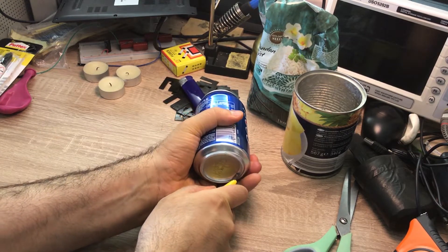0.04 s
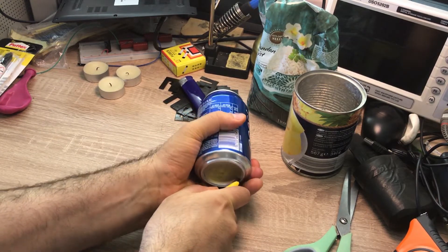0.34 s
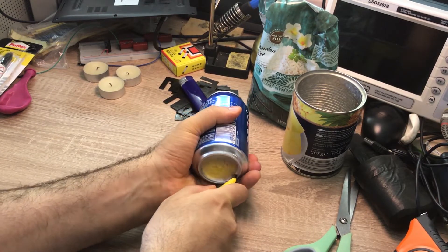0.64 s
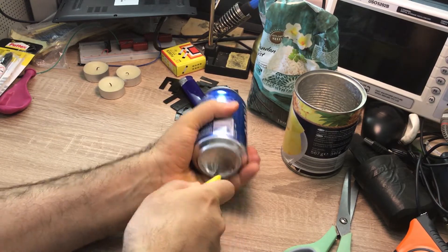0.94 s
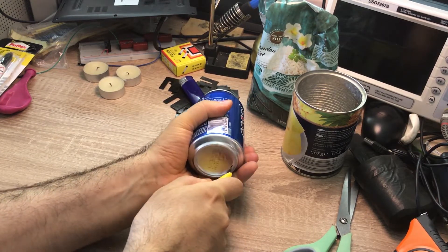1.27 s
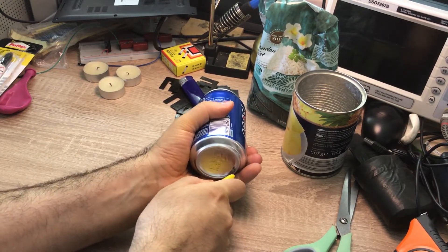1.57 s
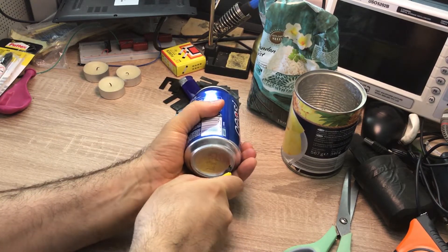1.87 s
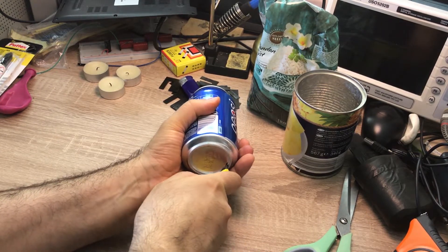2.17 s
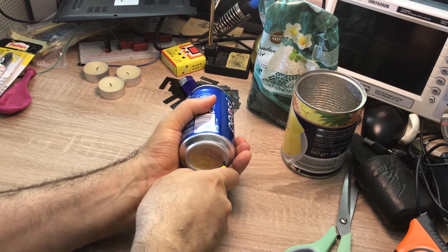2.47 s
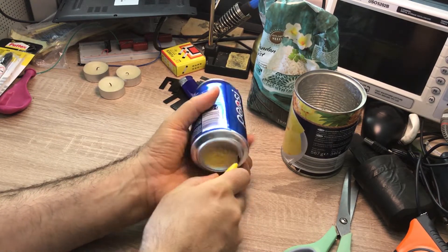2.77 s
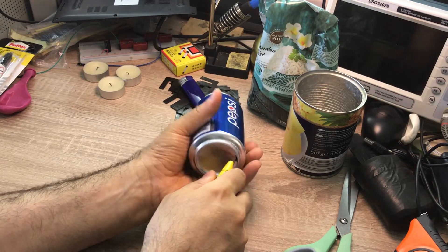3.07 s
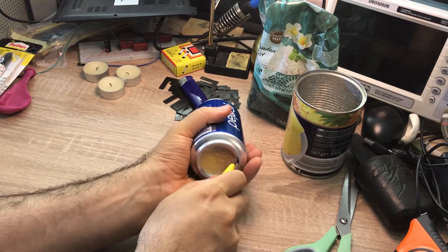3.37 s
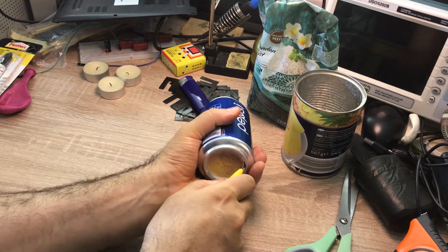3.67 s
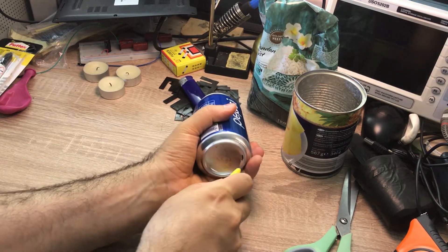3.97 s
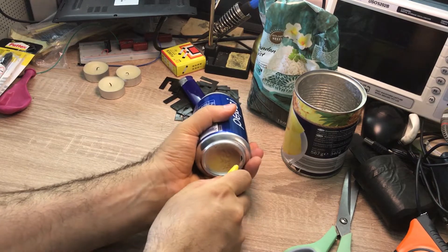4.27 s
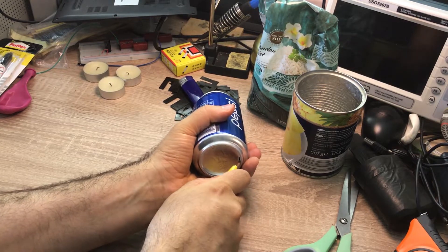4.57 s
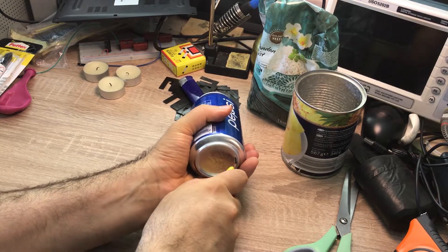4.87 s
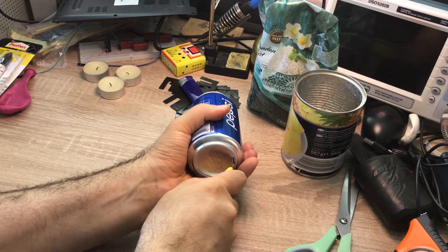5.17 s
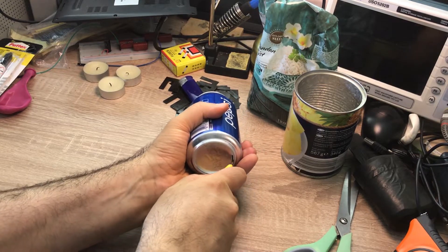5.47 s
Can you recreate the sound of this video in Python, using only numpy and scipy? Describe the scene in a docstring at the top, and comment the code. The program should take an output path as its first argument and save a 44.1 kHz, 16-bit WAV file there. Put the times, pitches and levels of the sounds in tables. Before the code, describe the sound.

A utility knife bites into the bottom of an empty aluminium can with a sharp snap and a low thud. The blade sticks and slips in scattered tinny clicks, then scrapes briefly through a denser run of crackles midway. The thin wall pops, hands bump dully on a wooden desk and fingers rub faintly on the can. It sounds close, in a small, quiet room with faint hum and hiss.

```python
"""A utility knife works through the bottom rim of an empty aluminium can, held over a wooden desk.
The blade sticks, then tears on in short runs of tiny fractures that ring the thin wall and the air
inside. The first cut jolts the can with a low thud. The hands bump the desk, the wall pops under the
fingers, and skin rubs on the paint. Two faint squeaks glide upward.
A small, quiet room answers, over low rumble, hum and hiss."""
import sys
import numpy as np
from scipy import signal
from scipy.fft import rfft, irfft
from scipy.io import wavfile

SR = 44100
rng = np.random.default_rng(int(sys.argv[2]) if len(sys.argv) > 2 else 0)


def to_wav(s):
    """Save 16-bit WAV."""
    ch = np.atleast_2d(s).T  # columns
    pcm = np.round(np.clip(ch, -1, 1) * 32767)  # PCM
    wavfile.write(sys.argv[1], SR, pcm.astype(np.int16))


N = 244314
SPAN, LEAD = 2 ** 15, 2 ** 11  # samples in one event, and ahead of its peak
T = np.arange(SPAN) / SR
ALL_ROUND = .3  # share of the ring in the sound that spreads to all sides

# Centres in Hz of the bands that shape the blade's snaps.
CUT_BANDS_HZ = [900, 2500, 6200, 13000]
# The hand-damped aluminium wall. Each row: mode in Hz, dB over the bare click, t60 in seconds.
WALL_MODES = [(783, 7.5, 0.014), (1268, 4.5, 0.035), (1585, 3.5, 0.0443), (1796, 7, 0.079),
              (2050, 0, 0.027), (2360, 0, 0.022), (2570, 1, 0.017), (2795, 2.5, 0.016), (3157, 0, 0.042),
              (3407, 5, .035), (3870, 2, .03), (4520, 2.5, .02), (5740, 1.5, 0.026), (6100, 5, 0.031),
              (6280, 10, 0.016), (6960, 9.5, 0.021), (8680, 5.5, 0.011), (9100, -9.5, 0.014),
              (12230, 10, .03)]
# The blade scores the metal. Each row: time of the hardest push in seconds, level in dB.
STROKES = [(2.74, -55.5), (2.959, -58), (3.091, -64)]
STROKE_SWELL_DB_S, STROKE_EASE_DB_S = 151, 187


def undb(db):
    """Decibels to gain."""
    return 10 ** (np.asarray(db) / 20)


def unit(x):
    """Scale to energy 1."""
    return x / np.sqrt(np.sum(x ** 2) + 1e-20)


def along(points, size):
    """Read (Hz, value) points at every bin of a spectrum."""
    hz, value = np.transpose(points)
    return np.interp(np.log(np.arange(size // 2 + 1) * SR / size + 1), np.log(hz), value)


def band_weights(centres):
    """Overlapping bands that add up to the whole spectrum of an event."""
    return np.array([along(list(zip(centres, row)), SPAN) for row in np.eye(len(centres))])


def pass_filter(x, hz, kind, order=2):
    """High-pass or low-pass."""
    return signal.sosfilt(signal.butter(order, hz, kind, fs=SR, output="sos"), x)


def colour(x, points):
    """Shape x by (Hz, dB) points, rms 1."""
    return unit(irfft(rfft(x) * undb(along(points, N)), N)) * np.sqrt(N)


def voiced(x, centres, levels_db):
    """Bend the spectrum smoothly toward each band's level, as rms over 10 ms."""
    spectrum, bands = rfft(x), band_weights(centres)
    for _ in range(2):
        power = 2 * bands ** 2 @ np.abs(spectrum) ** 2 / (SPAN * SR * .01)
        boost_db = levels_db - 10 * np.log10(power)
        spectrum = spectrum * undb(along(list(zip(centres, boost_db)), SPAN))
    return irfft(spectrum, SPAN)


def fade(t60):
    """Exponential decay, 60 dB down after t60 seconds."""
    return np.exp(-np.log(1000) * T / max(t60, 1e-3))


def swell(pushes, rise_db_s, fall_db_s):
    """Gain over time of (s, dB) pushes that each swell and ease at steady rates."""
    t = np.arange(N) / SR
    curves_db = [db - np.maximum(rise_db_s * (s - t), fall_db_s * (t - s)) for s, db in pushes]
    return undb(np.max(curves_db, axis=0))


def add(out, s, x):
    """Mix x in at s seconds."""
    i = int(s * SR)
    out[i:i + len(x)] += x[:len(out) - i]


def ring(hz, t60, attack_s):
    """One mode with a soft onset."""
    return np.sin(2 * np.pi * hz * T) * fade(t60) * (1 - fade(attack_s))


def body(modes, grip_db, detune):
    """Ring of struck modes; contact point and grip vary their strength and pitch at each blow."""
    out = np.zeros(SPAN)
    for (hz, db, t60), (grip, drift) in zip(modes, rng.standard_normal((len(modes), 2))):
        peak = undb(db + grip_db * grip) * 2 * np.log(1000) / (t60 * SR)
        out += peak * np.cos(2 * np.pi * hz * (1 + detune * drift) * T) * fade(t60)
    return out


def resonate(x, response, share=1):
    """The bare excitation plus the ring it drives."""
    return x + share * signal.fftconvolve(x, response)[:len(x)]


def snap_run(rise_ms, fall_ms, grain_db, rattle_db, rattle_t60):
    """A run of tiny snaps that swells and dies; bending waves rattle on after it."""
    ms = (np.arange(SPAN) - LEAD) / SR * 1000
    run = np.exp(-np.abs(ms) / np.where(ms < 0, rise_ms, fall_ms))
    rattle = undb(rattle_db) * np.roll(fade(rattle_t60), LEAD) * (ms >= 0)
    sizes = np.repeat(undb(grain_db * rng.standard_normal(SPAN // 16)), 16)
    return rng.standard_normal(SPAN) * np.hypot(run * sizes, rattle)


def background():
    """A bed of faint hum, low room rumble and thin microphone hiss."""
    # Steady tones. Each row: pitch in Hz, rms level in dB.
    hum_tones = [(49.5, -76), (140, -78.5)]
    # Two noise colours. Each row: frequency in Hz, relative level in dB.
    rumble_colour = [(13, -37.5), (22, -13.5), (33, -5.5), (54, 0), (113, -13.5), (135, -11), (279, -15.5),
                     (418, -21.5), (551, -23), (784, -25), (867, -24.5), (959, -28), (1300, -30.5),
                     (9000, -41), (11700, -62), (19800, -120)]
    hiss_colour = [(3000, -39), (6800, -10.5), (7200, -5.5), (7700, -27), (9300, -8.5), (10500, -15),
                   (11700, -6.5), (12350, 1), (13200, -3), (14500, 1.5), (15200, -4.5), (16500, -7)]
    t = np.arange(N) / SR
    hum = sum(undb(db) * np.sqrt(2) * np.sin(2 * np.pi * (hz * t + rng.random())) for hz, db in hum_tones)
    rumble = undb(-64.52) * colour(rng.standard_normal(N), rumble_colour)
    hiss = undb(-74.5) * colour(rng.standard_normal(N), hiss_colour)
    return rumble + hiss + hum


def desk_bumps():
    """The hands knock dully on the wooden top. Returns the direct sound and the room send."""
    # Each row: time in seconds, die-away in ms, relative level in dB, contact hardness from 0 to 1.
    bumps = [(0.2211, 8.5, -47.5, 0.1), (.877, 4.5, -48.5, .05), (2.77, 3.3, -40.5, 0),
             (3.2586, 6.6, -36, 0.73), (4.133, 7.4, -44.5, 0.9)]
    # Band centres in Hz, then the dB in each band for a soft and for a hard contact.
    bands_hz = [120, 280, 700, 2200, 7000]
    soft_db = [-7, 0, -8.5, -28, -36]
    hard_db = [-11.5, -1.5, 4, -1.5, -20]
    # The desk top. Each row: mode in Hz, dB over the bare knock, t60 in seconds.
    desk_modes = [(133, 8, .12), (213, 13, 0.095), (276, 17, .06), (574, 18, 0.048), (666, 0.5, .02),
                  (848, 13, 0.096), (1120.4, 6, 0.076), (1785, 3.5, 0.044), (2120, 8.5, .03),
                  (3080, 3, 0.0072)]
    direct, send = np.zeros((2, N))
    for s, fall_ms, db, hardness in bumps:
        levels_db = db + (1 - hardness) * np.array(soft_db) + hardness * np.array(hard_db)
        force = snap_run(.5, fall_ms, grain_db=2, rattle_db=-15, rattle_t60=0.1)
        force = pass_filter(pass_filter(force, 100, "high"), 3700, "low")
        wood = body(desk_modes, grip_db=7.5, detune=.004)
        for bus, share in (direct, 1), (send, ALL_ROUND):
            add(bus, s - LEAD / SR, voiced(resonate(force, wood, share), bands_hz, levels_db))
    return undb(2.52) * np.array([direct, send])


def blade_moves():
    """Slips, drags, gives and chips as (s, rise ms, fall ms, patch Hz, dB, dB per octave, cavity dB)."""
    # The blade slips with a snap. Each row: time in seconds, die-away in ms, pitch of the dented patch
    # in Hz, relative level in dB, brightness in dB per octave, relative air cavity level in dB.
    slips = [(0.2225, 1.9, 6010, -27.5, 0.5, -32.5), (0.2251, 6.8, 5960, -31.5, -3.5, -33.5),
             (0.418, 0.91, 2000, -47.5, -2.5, -53), (0.4539, 3, 990, -59, -4, -53),
             (0.458, 1.5, 2295, -36, -3, -38.5), (0.6494, 1.35, 1980, -34, 0, -39.5),
             (0.7153, 2.8, 2410, -43, -2.5, -33.5), (0.805, 1.7, 1000, -68.5, -3.5, -82),
             (0.8779, 8.9, 5820, -39, -.5, -65), (0.887, 3.5, 6700, -46, 4.5, -84),
             (0.893, 3, 14400, -34, 2.5, -75), (1.3523, 1.4, 6000, -58, 0.5, -66),
             (1.4224, 1.2, 1980, -61.5, -2.5, -80), (1.4521, 0.97, 6000, -48.5, .8, -47),
             (1.4595, 2.6, 2530, -43, 1, -52), (1.4716, 1.9, 1990, -55.5, -4.5, -75),
             (1.534, 0.44, 1990, -53.5, -3, -72), (2.679, 4, 1160, -55, 1, -42.5),
             (2.6946, 0.9, 2600, -46.5, -0.5, -80), (2.7059, 1.56, 3070, -35.5, 4, -64),
             (2.716, 2, 3230, -47, 0, -41), (2.8492, 4.5, 3200, -61, 1, -62.5),
             (2.9064, 5.3, 6940, -50.5, .5, -52), (2.916, 3.7, 3250, -51.5, 1, -49.5),
             (2.9444, 2.6, 4250, -47, 3.5, -80), (2.9501, 1.8, 6800, -53, 8.5, -74),
             (2.9685, 2.7, 12560, -52, 0, -55.5), (2.981, 0.98, 6690, -57, -4, -50.5),
             (3.0095, 0.68, 1198, -43, -.5, -65), (3.058, 1.8, 6720, -37, -1, -77),
             (3.1649, 3.8, 1018, -57.5, -3, -72.5), (3.1908, 1.6, 6570, -47, -0.6, -47),
             (3.2251, 0.86, 3700, -58.5, -5.5, -58), (3.289, 2, 1214, -56.5, -4, -53),
             (3.7373, 2.2, 2480, -46, -0.5, -67), (3.7777, 3.7, 14100, -34.5, 0.5, -41.5),
             (3.787, 10, 3730, -48.5, 2, -64), (3.8158, 0.94, 1000, -53.5, -0.5, -80),
             (4.344, 2.6, 2640, -54, 0, -55), (4.374, 1.9, 3110, -54, 0.5, -54),
             (4.4586, 6.7, 1080, -62, -2.5, -50.5)]
    # The blade drags, swelling until it catches.
    # Each row: time in seconds, build-up in ms, patch pitch in Hz, relative level in dB.
    drags = [(2.088, 5.2, 6240, -60), (2.1011, 2.9, 2205, -50), (2.509, 3, 6160, -65),
             (2.5424, 8.9, 6100, -60), (4.364, 5.5, 3470, -55), (5.3856, 6.4, 2260, -56)]
    # The wall gives softly, mostly moving the air inside. Each row: time in seconds, relative dB.
    gives = [(0.379, -51), (1.8119, -50.5), (1.9988, -54.5)]
    build_share = .16  # a snap's build-up over its die-away
    for s, fall_ms, *tone in slips:
        yield s, build_share * fall_ms, fall_ms, *tone
    for s, rise_ms, patch_hz, db in drags:
        yield s, rise_ms, 2, patch_hz, db, -0.2, db - 1.5
    for s, db in gives:
        yield s, .3, 1.4, 1000, db - 21.5, -5.5, db  # only a dull tick from the metal
    # small random chips snap off each stroke, louder where the push is harder
    push = swell(STROKES, STROKE_SWELL_DB_S, STROKE_EASE_DB_S)
    chips_per_stroke, reach_s, chip_ms, scatter_db = 3, 0.096, 1.8, 4.5
    for s, _ in STROKES:
        for offset, octaves, size in rng.uniform(-1, 1, (chips_per_stroke, 3)):
            at = s + reach_s * offset
            db = 20 * np.log10(push[int(at * SR)]) - 3 + scatter_db * size
            yield at, build_share * chip_ms, chip_ms, 3500 * 2 ** octaves, db, 0, db - 1


def snap_levels(db, tilt_db, patch_hz):
    """Band levels of a snap: one shape, tilted by its brightness and lifted around its patch pitch."""
    # A snap of middle brightness: relative dB in each cut band.
    shape_db = [-6.5, -2.5, -2, -7.5]
    # Emphasis at the dented patch. Each row: level of the snap in dB, lift in dB.
    patch_lift = [(-72.5, 3.5), (-50.5, 6), (-42, 7.5), (-27.5, 5)]
    pivot_hz, width_octaves = 3500, .75
    hz = np.array(CUT_BANDS_HZ)
    nearness = np.exp(-(np.log2(hz / patch_hz) / width_octaves) ** 2)
    lift_db = np.interp(db, *np.transpose(patch_lift)) * nearness
    return db + np.array(shape_db) + tilt_db * np.log2(hz / pivot_hz) + lift_db


def knife():
    """Fractures ring the wall and puff the air in the can. Returns the direct sound and the room send."""
    cavity_hz, patch_cycles = 386, 42
    direct, send, air = np.zeros((3, N))
    for s, rise_ms, fall_ms, patch_hz, db, tilt_db, cavity_db in blade_moves():
        levels_db = snap_levels(db, tilt_db, patch_hz)
        force = snap_run(rise_ms, fall_ms, grain_db=5, rattle_db=-17, rattle_t60=0.052)
        force = pass_filter(pass_filter(force, 270, "high"), 15000, "low")
        wall = body(WALL_MODES, grip_db=-1.5, detune=.003)
        # the dented patch under the blade rings briefly at its own pitch
        patch = body([(patch_hz, 13.5, patch_cycles / patch_hz)], grip_db=-4, detune=0)
        # summed over all directions, the resonances stand out less in the send
        for bus, wall_share, patch_share in (direct, 1, 1), (send, ALL_ROUND, .55):
            snap = resonate(resonate(force, wall, wall_share), patch, patch_share)
            add(bus, s - LEAD / SR, voiced(snap, CUT_BANDS_HZ, levels_db))
        # the air hums through the drinking hole
        hum_hz = cavity_hz * (1 + .012 * rng.standard_normal())
        add(air, s, undb(cavity_db) * ring(hum_hz, t60=0.12, attack_s=0.006))
    return undb(-2.16) * np.array([direct, send]) + undb(0.5) * air


def jolt_and_pops():
    """A low thud as the first cut jolts the can, then short pops of the wall."""
    # The thud, then the pops. Each row: start in seconds, pitch in Hz, level in dB, t60 in seconds.
    cues = [(0.224, 72, -41, 0.23), (.8765, 822, -38, 0.08), (3.039, 1120, -60, 0.062),
            (3.1652, 805, -49.5, 0.12), (3.7320, 900, -52, 0.028), (3.8175, 855, -34.5, 0.05)]
    out = np.zeros(N)
    for s, hz, db, t60 in cues:
        add(out, s, undb(db) * ring(hz, t60, attack_s=0.0041))
    return out


def squeaks():
    """Faint, very high, unsteady tones that glide upward."""
    # Each row: start in seconds, level in dB.
    cues = [(2.308, -71.5), (4.30, -72)]
    start_hz, rise_hz_s, length_s, flutter_hz = 12400, 8000, .07, 260
    arch = np.sin(np.pi * np.minimum(T / length_s, 1))
    glide = np.sin(2 * np.pi * (start_hz + rise_hz_s * T / 2) * T)
    out = np.zeros(N)
    for s, db in cues:
        flutter = unit(pass_filter(rng.standard_normal(SPAN), flutter_hz, "low")) * np.sqrt(2 * SPAN)
        add(out, s, undb(db) * arch * flutter * glide)
    return out


def scoring():
    """The blade tip creeps along its groove, and the fine grit rings the wall."""
    # Tone of the scrape. Each row: frequency in Hz, relative level in dB.
    scrape_colour = [(200, -35), (900, 3), (2000, -8.5), (4000, -3), (6000, -18), (9000, -6.5),
                     (16000, -11)]
    grit = rng.standard_normal(N) * undb(5.4 * rng.standard_normal(N))
    clumps = undb(2 * np.repeat(rng.standard_normal(N), 128)[:N])
    wall = body(WALL_MODES, grip_db=3, detune=0.005)
    scrape = colour(resonate(grit * clumps, wall, ALL_ROUND), scrape_colour)
    return scrape * swell(STROKES, STROKE_SWELL_DB_S, STROKE_EASE_DB_S)


def finger_rubs():
    """Skin slides over the paint as the can is turned."""
    # Each row: time of the fastest slide in seconds, level in dB.
    rubs = [(3.57, -66.5), (3.635, -56.5), (4.61, -64), (5.03, -67)]
    # Tone of the friction. Each row: frequency in Hz, relative level in dB.
    rub_colour = [(100, -4), (400, -1.5), (720, -7), (930, 3.5), (1400, -16), (2500, -12.5), (5000, -29),
                  (16000, -60)]
    return colour(rng.standard_normal(N), rub_colour) * swell(rubs, rise_db_s=184, fall_db_s=303)


def room(direct, send, wet_db, build_s):
    """Diffuse echoes build up from desk and walls and fade sooner in the treble."""
    # The reverb tail. Each row: band centre in Hz, t60 in seconds, relative level in dB.
    decays = [(100, 0.87, -1.5), (400, 0.22, 4), (1897, 0.34, 3), (3237, 0.38, -1), (6500, 0.32, -1.5),
              (10000, .26, 0), (14690, 0.13, 5.5)]
    spectrum = rfft(rng.standard_normal(SPAN))
    bands = irfft(spectrum * band_weights([hz for hz, _, _ in decays]), SPAN)
    tail = sum(undb(db) * band * fade(t60) for band, (_, t60, db) in zip(bands, decays))
    response = unit(tail * (1 - fade(build_s)))
    return direct + undb(wet_db) * signal.fftconvolve(send, response)[:N]


def scene():
    """Can and desk in the room, over the quiet bed, in mono."""
    direct, send = knife() + scoring() + jolt_and_pops() + finger_rubs() + squeaks()
    can = room(direct, send, wet_db=-15, build_s=0.039)
    desk = room(*desk_bumps(), wet_db=-10.5, build_s=0.021)
    return (can + desk + background())[None]


def record(dry):
    """Steep filters trim the deepest bass and the very top."""
    bottom_hz, top_hz = 31.85, 16000
    top_cut = signal.ellip(10, .2, 70, top_hz, fs=SR, output="sos")
    return signal.sosfilt(top_cut, pass_filter(dry, bottom_hz, "high", order=6))


dry = scene()
out = record(dry)
to_wav(out)
```